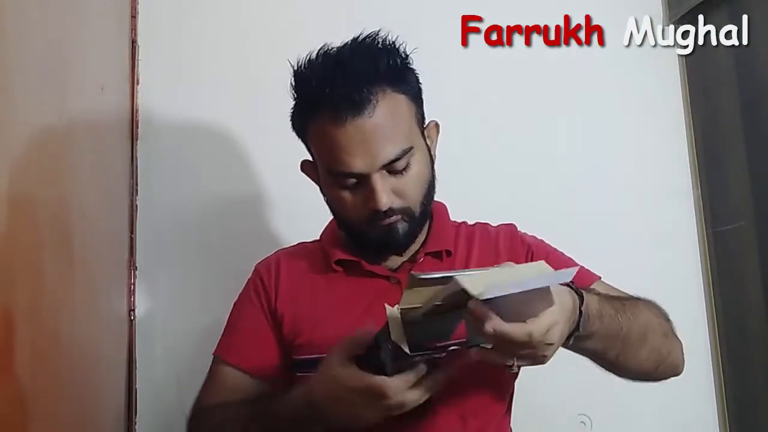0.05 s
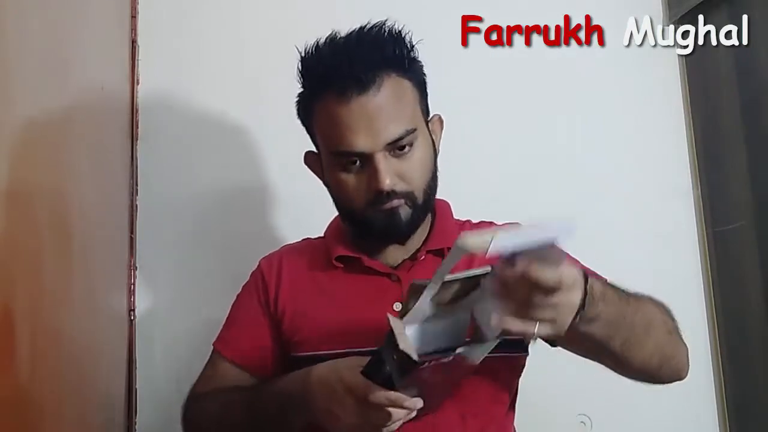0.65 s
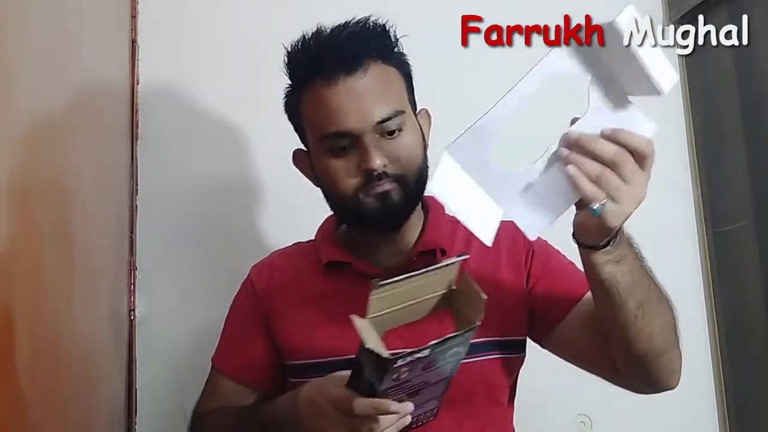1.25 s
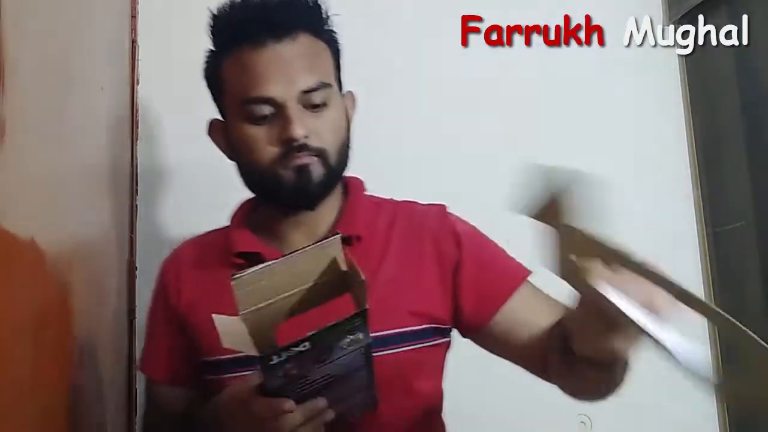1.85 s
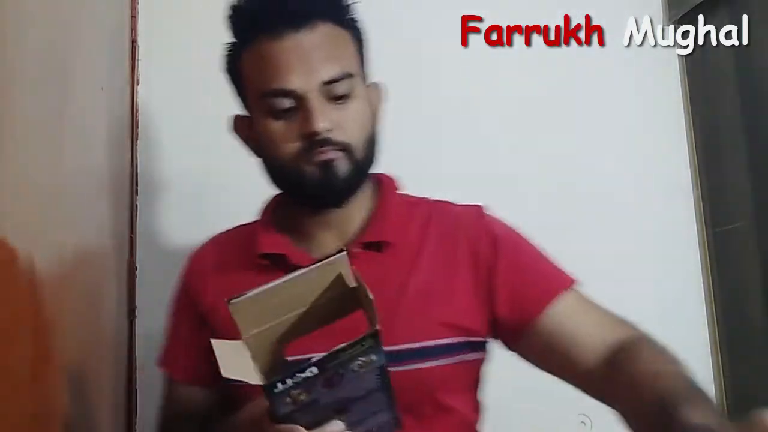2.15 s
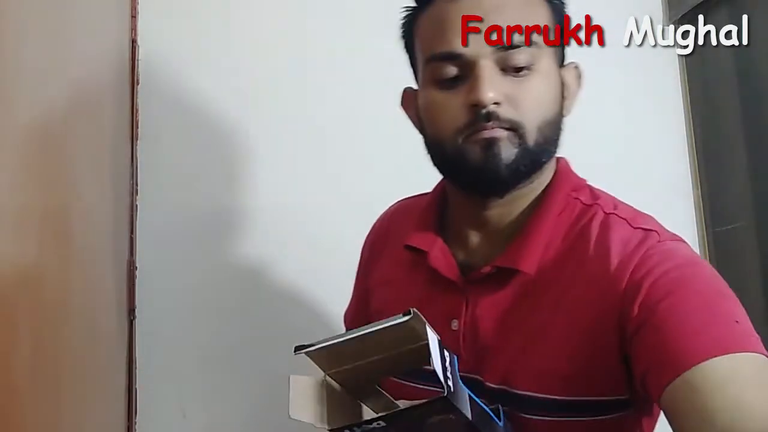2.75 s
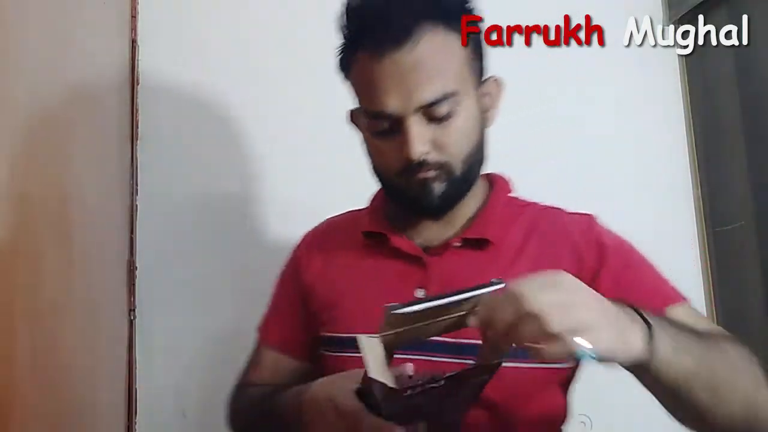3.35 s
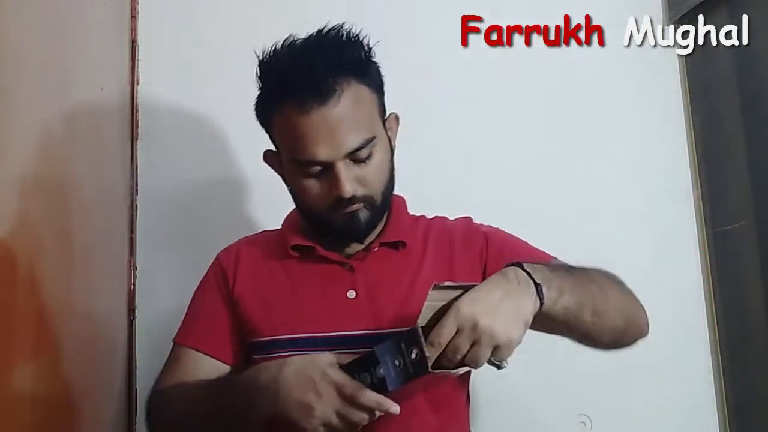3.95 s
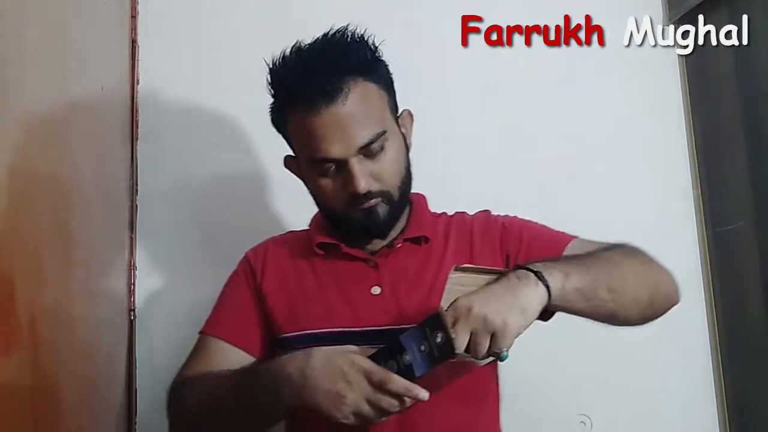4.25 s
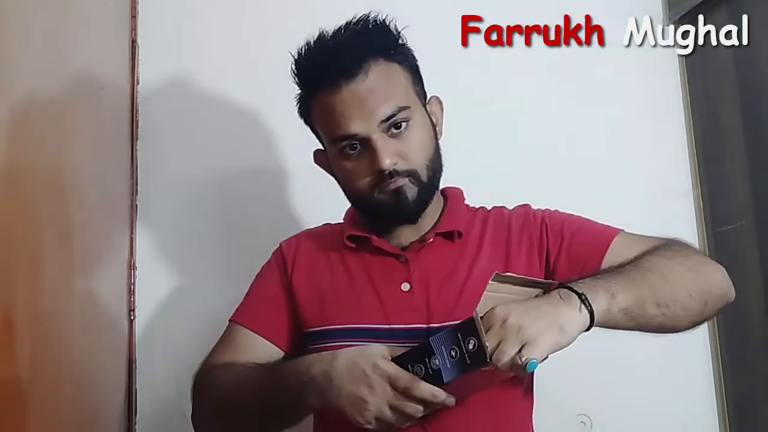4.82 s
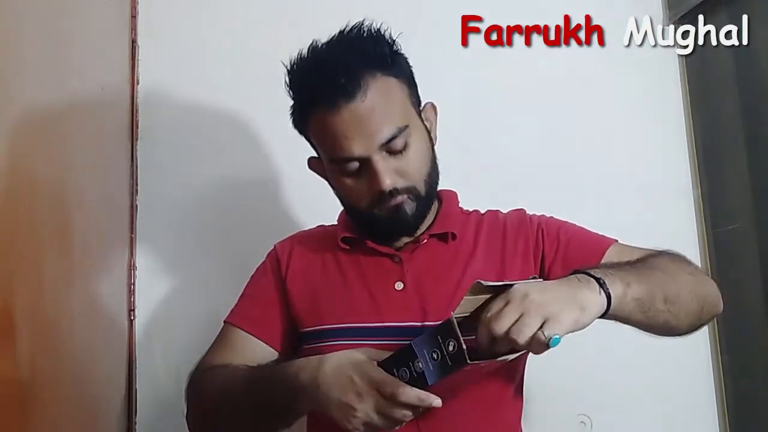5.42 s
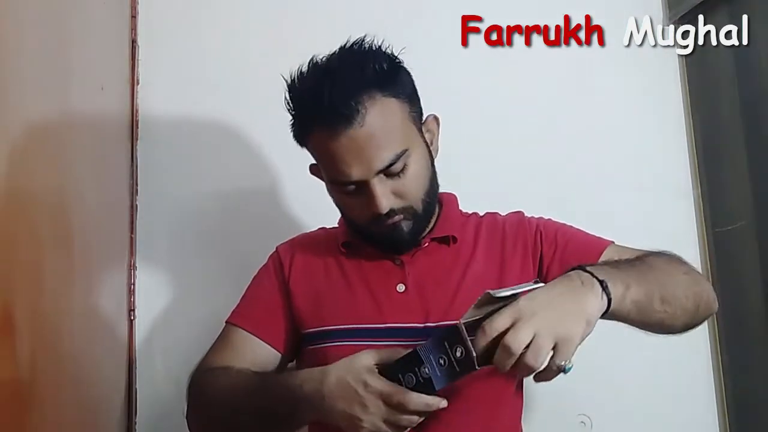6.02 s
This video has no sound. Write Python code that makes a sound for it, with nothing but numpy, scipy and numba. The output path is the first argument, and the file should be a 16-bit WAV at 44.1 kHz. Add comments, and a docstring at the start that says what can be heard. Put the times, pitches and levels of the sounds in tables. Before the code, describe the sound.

Fingers knock and rub on a small cardboard box, then a card insert slides out with a dry, hissing scrape. The loose sheet wobbles and clicks at its creases before landing on a table with a quick clatter and skid. The hand goes back into the box, with snapping flaps, rasping rubs and faint squeaks. A phone microphone picks it up in a bare, slightly echoing room.

```python
"""Fingers knock and rub on a small cardboard box, then drag out a card insert: stick-slip friction hisses
at the surface, rasps in the panels and excites the hollow. The loose sheet wobbles and its creases click.
Near 3 s it lands on a table to one side, rebounds and skids. The hand then digs in the box again: flaps
snap, fingertips judder and skin squeaks. Throughout, a phone with two microphone ports picks up the
sound across a bare, echoing, faintly murmuring room."""
import sys
import numpy as np
from scipy import signal
from scipy.fft import rfft, irfft
from scipy.io import wavfile
from numba import njit

SR = 44100
rng = np.random.default_rng(int(sys.argv[2]) if len(sys.argv) > 2 else 0)


def unload_audio(sound):
    """Save the sound as a 16-bit wav file, at the path given as the first command line argument."""
    columns = np.transpose(np.atleast_2d(sound))
    # keep every value between -1 and 1, then stretch to whole-number steps
    steps = np.round(np.clip(columns, -1, 1) * 32767)
    wavfile.write(sys.argv[1], SR, steps.astype(np.int16))


N = 268119
TIME = np.arange(N) / SR
PORT_TRANSIT_S = .15 / 343  # port spacing over the speed of sound


def undb(db):
    """Decibels to amplitude ratio."""
    return 10 ** (np.asarray(db) / 20)


def unit(x):
    """Scale to rms 1."""
    return x / np.sqrt(np.mean(x ** 2))


def at_hz(hz, points):
    """Interpolate a curve on a log-frequency axis."""
    f, value = np.transpose(points)
    return np.interp(np.log(np.maximum(hz, 1)), np.log(f), value)


def colour(x, points):
    """Filter by multiplying the spectrum with a gain curve."""
    size = x.shape[-1]
    return irfft(rfft(x) * undb(at_hz(np.fft.rfftfreq(size, 1 / SR), points)), size)


def add(track, start_s, sound):
    """Superpose a sound on a track."""
    i = int(start_s * SR)
    track[i:i + len(sound)] += sound[:max(N - i, 0)]


def wander(rate_hz):
    """Interpolated Gaussian noise, spread near 1."""
    return np.interp(TIME * rate_hz, np.arange(N), rng.standard_normal(N))


def diffuse(size):
    """A diffuse field at two ports is coherent in the bass and incoherent in the treble."""
    coherence = .9 * np.sinc(2 * np.fft.rfftfreq(size, 1 / SR) * PORT_TRANSIT_S)
    mid, side = rfft(rng.standard_normal((2, size)))
    mid, side = mid * np.sqrt(1 + coherence), side * np.sqrt(1 - coherence)
    return unit(irfft([mid + side, mid - side], size))


def room_murmur(level_db=-63, waver_db=1):
    """Background noise forms a faint, low diffuse field."""
    # murmur spectrum: frequency_hz, gain_db
    spectrum = [(25, -12.5), (60, -7.5), (115, 4), (180, -7), (350, -5), (600, -12.5), (1200, -21),
                (3500, -29.5), (7800, -32.5), (9500, -28), (15000, -48)]
    return undb(level_db + waver_db * wander(1.7)) * unit(colour(diffuse(N), spectrum))


def slips(rate_hz, spread_db):
    """Stick-slip: fibres catch and let go in a Poisson train of very uneven clicks."""
    released = rng.random(N) < rate_hz / SR
    clicks = released * rng.standard_normal(N)
    return unit(clicks * undb(spread_db * np.minimum(rng.exponential(size=N), 4)))


def stroke_power(strokes, voice_db, rise_share, flatness=2.05):
    """Friction noise follows a power law of sliding speed, which rises and falls in a bell curve."""
    # powers of speed that set amplitude: hiss_exponent, rasp_exponent, hollow_exponent
    speed_law = (0.9, 0.92, 0.96)
    power = np.zeros((3, N))
    for peak_s, length_s, db in strokes:
        near = slice(max(int((peak_s - 2 * length_s) * SR), 0), int((peak_s + 2 * length_s) * SR))
        t = TIME[near] - peak_s
        flank_s = length_s * np.where(t < 0, rise_share, 1 - rise_share)
        speed = np.exp(-np.abs(t / flank_s) ** flatness)
        power[:, near] += (undb(db) * undb(voice_db)[:, None] * speed ** np.array(speed_law)[:, None]) ** 2
    return power


def cavity_hz(time_s):
    """The cavity resonance of the box shifts as the insert and the hand fill it."""
    # main resonance: time_s, pitch_hz
    cavity = [(.1, 616), (.7, 745), (1.15, 502), (3.55, 493), (3.67, 763), (3.87, 470), (4.0, 734),
              (4.57, 448), (4.72, 764), (5.6, 806), (6.0, 601)]
    return np.interp(time_s, *np.transpose(cavity))


@njit
def resonance(x, hz, width_hz):
    """A second-order resonator with a moving centre, where its gain is 1."""
    out, band, low = np.empty(len(x)), 0., 0.
    for i in range(len(x)):
        tuning, damping = np.tan(np.pi * hz[i] / SR), width_hz / hz[i]
        velocity = (band + tuning * (x[i] - low)) / (1 + tuning * (tuning + damping))
        band, low = 2 * velocity - band, low + 2 * tuning * velocity
        out[i] = damping * velocity
    return out


def scraping(hiss_db=-9.5, rasp_db=-1, hollow_db=-1, jerk_db=3.5, cavity_db=7, cavity_width_hz=110.):
    """Source and filter: the slips under a jerking hand excite surface, panels and hollow alike."""
    # strokes: peak_s, length_s, level_db
    rubs = [(.068, 0.077, -40.5), (.135, 0.13, -44), (3.478, 0.035, -32), (3.575, .08, -39),
            (3.688, 0.043, -31.5), (3.722, 0.044, -27.5), (3.83, 0.37, -40.5), (4.07, 0.031, -25.5),
            (4.15, 0.14, -41.5), (4.45, 0.11, -57), (4.636, 0.085, -39.5), (4.731, 0.039, -34),
            (5.352, 0.19, -25.5), (5.71, 0.07, -62.5), (5.8, 0.028, -35.5), (5.895, 0.093, -27.5),
            (5.98, 0.21, -45)]  # fingers on the box walls
    presses = [(.135, 0.1, -37), (3.95, 0.05, -44), (5.105, 0.057, -50), (5.205, 0.12, -37),
               (5.5, 0.11, -39)]  # the hand pushing along the bottom
    brushes = [(.332, 0.061, -34.5), (.595, 0.076, -29), (1.1, .1, -27.5), (1.355, 0.049, -49.5),
               (1.475, 0.1, -37.5), (1.575, 0.12, -34.5), (1.92, 0.15, -38.5), (2.131, 0.023, -33),
               (2.319, 0.026, -39.5), (2.468, 0.066, -54), (4.288, 0.054, -38.5), (4.44, 0.061, -45),
               (4.845, 0.028, -46.5), (5.1, 0.079, -48)]  # loose card passing fingers and flaps
    pulls = [(.645, 0.13, -22.5), (.82, 0.21, -34.5), (.92, .16, -26.5), (1.05, 0.02, -32)]  # the insert dragged out
    skids = [(2.905, 0.0072, -29.5), (3.017, 0.048, -28.5)]  # the insert on the table
    # balance of each kind of stroke: hiss_db, rasp_db, hollow_db
    rub_voice = (0, -2.96, -5)
    press_voice = (-9, -10, 0)
    brush_voice = (0, -16.5, -40)
    pull_voice = (0.5, -7.5, -13.5)
    skid_voice = (-29, 0, -10)
    # responses of surface, panels and hollow: frequency_hz, gain_db
    hiss_curve = [(1500, -95), (3500, -47), (5300, 3), (7000, -1), (9500, 3.5), (12000, -2.5), (14000, 0.5),
                  (16000, -12.5)]
    rasp_curve = [(500, -18.5), (950, -12), (1300, -0.5), (1520, -0.5), (1800, -0.5), (2200, -1.5),
                  (2950, -6.5), (3600, -2), (4600, -8.5), (7000, -22.5)]
    hollow_curve = [(90, -24), (200, -27), (330, -10), (450, 8), (560, 4), (690, 6), (850, 8.5), (1050, 9),
                    (1400, -19), (3000, -82.5)]
    friction = slips(rate_hz=6000, spread_db=2) * undb(jerk_db * wander(rate_hz=90))
    power = (stroke_power(rubs, rub_voice, rise_share=.5)
             + stroke_power(presses, press_voice, rise_share=.46)
             + stroke_power(brushes, brush_voice, rise_share=.43)
             + stroke_power(pulls, pull_voice, rise_share=.23)
             + stroke_power(skids, skid_voice, rise_share=.54))
    hiss, rasp, hollow = (colour(friction, curve) for curve in (hiss_curve, rasp_curve, hollow_curve))
    hollow = hollow + undb(cavity_db) * resonance(hollow, cavity_hz(TIME), cavity_width_hz)
    voices = [undb(hiss_db) * unit(hiss), undb(rasp_db) * unit(rasp), undb(hollow_db) * unit(hollow)]
    return (np.sqrt(power) * voices).sum(0)


def rebounding(hits, after_s, thud_db, snap_db):
    """Elastic rebound: springy card follows each blow with a softer one."""
    return [blow for s, thud, snap in hits
            for blow in ((s, thud, snap), (s + after_s, thud + thud_db, snap + snap_db))]


def impacts(hits, modes, thud_db, snap_db, tilt_db_per_octave, crunch_s=.0008, detune=.028, blow_s=.005):
    """An impact crunches fibres and excites damped modes, a little differently at every spot."""
    # crunch spectrum: frequency_hz, gain_db
    spectrum = [(150, -32), (600, -17), (1300, 8), (2500, -2.5), (3900, 1.5), (4800, 0), (6000, 4),
                (7500, -4), (9500, 1.5), (12000, -4), (16000, -4)]
    tilted = [(f, gain + tilt_db_per_octave * np.log2(f)) for f, gain in spectrum]
    out, t = np.zeros(N), TIME[:SR // 8]
    hz, db, t60_s = np.transpose(modes)[:, :, None]
    decay = np.exp(-np.log(1000) * t / t60_s)
    for start_s, thud, snap in hits:
        spot_db, pitch = rng.standard_normal((2, len(modes), 1))
        sign = rng.choice([-1, 1], (len(modes), 1))
        partials = np.sin(2 * np.pi * hz * (1 + detune * pitch) * t)
        ring = (sign * undb(db + spot_db) * decay * partials).sum(0)
        crunch = colour(rng.standard_normal(len(t)), tilted) * t * np.exp(-t / crunch_s)
        blow = undb(thud + thud_db) * unit(ring) + undb(snap + snap_db) * unit(crunch)
        add(out, start_s, blow * np.sqrt(blow_s / t[-1]))  # levels count the energy as if within blow_s
    # a small panel radiates almost no bass
    return signal.sosfilt(signal.butter(2, 280, "high", fs=SR, output="sos"), out)


def box_knocks():
    """Fingers and flaps strike the box and set its modes in free vibration."""
    # blows: start_s, thud_db, snap_db
    hits = [(.049, -27, -30), (.113, -24, -31.5), (.521, -65, -44.5), (1.05, -33, -37), (1.106, -40, -18.5),
            (3.457, -35, -14.5), (3.4885, -30, -12), (3.975, -24, -31), (4.003, -10, -7.5),
            (5.787, -52, -27.5), (6.063, -26.5, -12.5)]
    # box modes: pitch_hz, level_db, t60_s
    modes = [(267.6, -11.5, 0.048), (398, -9, 0.053), (559, -3.5, 0.05), (681, -0.5, 0.045),
             (875, -2, 0.048), (1116, -10, 0.054), (1284, 2, 0.0055), (1720, -23, 0.01), (2880, 6, 0.002),
             (3800, -5, 0.018)]
    blows = rebounding(hits, after_s=.009, thud_db=-2.5, snap_db=-20.5)
    return impacts(blows, modes, thud_db=-3.5, snap_db=-7, tilt_db_per_octave=3.2)


def judders(boom_s=.03, wobble_s=.036, pitch_spread=.09, rough_db=2.5):
    """Flexing or friction drives one resonance, randomly modulated in frequency and amplitude."""
    # a whole panel flexing: start_s, pitch_hz, level_db
    wobbles = [(.075, 248, -43), (1.22, 326, -43), (1.244, 223.4, -40), (2.882, 137.5, -37.5),
               (3.021, 236, -39), (3.291, 205, -53), (5.38, 361, -37.5), (5.434, 208, -41)]
    # skin squeaking on card: start_s, length_s, pitch_hz, level_db
    squeaks = [(0.556, 0.085, 3804, -42), (1.419, 0.1, 2730, -55.5), (1.721, 0.055, 1585, -49),
               (2.698, 0.012, 1615, -52), (3.212, 0.018, 1590, -47), (4.405, 0.11, 1512, -59.5),
               (4.406, 0.066, 3550, -56.5), (4.55, 0.087, 3640, -54)]
    # fingertips juddering at the pitch of the hollow: start_s, level_db
    booms = [(3.668, -27.5), (4.282, -50), (4.574, -47.5), (4.727, -37.5), (5.008, -55), (5.085, -45.5)]
    events = [(s, boom_s, cavity_hz(s), db) for s, db in booms]
    events += [(s, wobble_s, hz, db) for s, hz, db in wobbles] + squeaks
    out = np.zeros(N)
    for start_s, length_s, hz, db in events:
        cycles = TIME[:int(length_s * SR)] * hz
        pitch, size = (np.interp(cycles / 2, np.arange(256), v) for v in rng.standard_normal((2, 256)))
        phase = 2 * np.pi * np.cumsum(hz * (1 + pitch_spread * pitch)) / SR
        shudder = undb(rough_db * size) * np.sin(phase)
        add(out, start_s, undb(db) * unit(shudder * np.hanning(len(shudder))))
    return out


def crease_clicks():
    """Clicking creases excite the modes of the loose insert impulsively."""
    # clicks: start_s, thud_db, snap_db
    hits = [(1.730, -41.5, -29), (1.797, -31, -31)]
    # insert modes: pitch_hz, level_db, t60_s
    modes = [(1160, 1, 0.02), (1700, -29, .015), (2373, 12, 0.038), (2585, 13, 0.03), (4500, 3, 0.015)]
    blows = rebounding(hits, after_s=.014, thud_db=-7, snap_db=-19)
    return impacts(blows, modes, thud_db=.5, snap_db=-5.5, tilt_db_per_octave=1.3)


def table_landing():
    """The insert lands and settles in a run of impacts with heavily damped ringing."""
    # contacts: start_s, thud_db, snap_db
    hits = [(2.853, -23.5, -27), (2.8795, -15, -19.5), (2.887, -2.5, -9), (2.916, -14, -23),
            (2.981, -17, -22.5), (3.010, -15, -33.5), (3.0215, -15, -16.5)]
    # modes of card on table: pitch_hz, level_db, t60_s
    modes = [(520, -22, 0.015), (684, -11, 0.036), (1036, -1, 0.019), (1132, 2.5, 0.024), (1325, -5, 0.015),
             (1670, -2, 0.014), (1930, -8.5, 0.023), (2600, -7, 0.011), (3030, -5.5, 0.0087)]
    blows = rebounding(hits, after_s=.011, thud_db=-14, snap_db=-3.5)
    return impacts(blows, modes, thud_db=-1, snap_db=-6.5, tilt_db_per_octave=-4.3)


def echoes(tail_db=-3.2, early_db=-17, build_s=.005, walls=6):
    """A room impulse response: early reflections, then exponentially decaying reverberation."""
    # reverberation time: frequency_hz, t60_s
    room_t60 = [(100, 0.22), (300, 0.54), (1000, 0.33), (3000, 0.35), (9000, 0.34), (16000, 0.29)]
    size = SR * 3 // 4
    hz, frame_s, cells = signal.stft(diffuse(size), SR, nperseg=256)
    decay = np.exp(-np.log(1000) * frame_s / at_hz(hz, room_t60)[:, None])
    tail = signal.istft(cells * decay, SR)[1][:, :size]
    response = undb(tail_db) * unit(tail * (1 - np.exp(-TIME[:size] / build_s))) / np.sqrt(size)
    for wall_s in rng.uniform(.0015, .022, walls):
        arrival_s = wall_s + rng.uniform(0, PORT_TRANSIT_S, 2)
        response[[0, 1], (arrival_s * SR).astype(int)] += undb(early_db)
    return response


def room(x, right_lag_s, pan_left_db, direct_db=-4.8):
    """Direct plus reverberant field: as the card bends, its two faces feed different echoes."""
    angle = 2 * wander(rate_hz=25)
    faces = np.cos(angle), np.sin(angle)
    reverb = sum(signal.fftconvolve((x * face)[None], echoes(), axes=1)[:, :N] for face in faces)
    direct = np.array([x, np.roll(x, round(right_lag_s * SR))])
    return (undb(direct_db) * direct + reverb) * undb([[pan_left_db], [-pan_left_db]])


def scene():
    """Equal-power panning carries the card between the box in front and the table at one side."""
    # how far the insert is held aside: time_s, power_share (0-1)
    path = [(1.5, 0), (1.8, 1), (3.2, 1), (3.4, 0)]
    reach = np.interp(TIME, *np.transpose(path))
    box, creases, table = box_knocks(), crease_clicks(), table_landing()
    card = scraping() + judders() + creases
    front = room(box + np.sqrt(1 - reach) * card, right_lag_s=-.00002, pan_left_db=.7)
    aside = room(table + np.sqrt(reach) * card, right_lag_s=.00042, pan_left_db=1.5)
    return front + aside + room_murmur()


def record(dry, port_hz=9450, port_q=9.3, port_db=10, top_hz=15700):
    """Port resonance lifts the high treble; peaks over full scale clip and a low-pass cuts the top."""
    ring = signal.lfilter(*signal.iirpeak(port_hz, port_q, fs=SR), dry)
    clipped = np.clip(dry + undb(port_db) * ring, -1, 1)
    return signal.sosfilt(signal.ellip(8, .2, 70, top_hz, fs=SR, output="sos"), clipped)


dry = scene()
out = record(dry)
unload_audio(out)
```